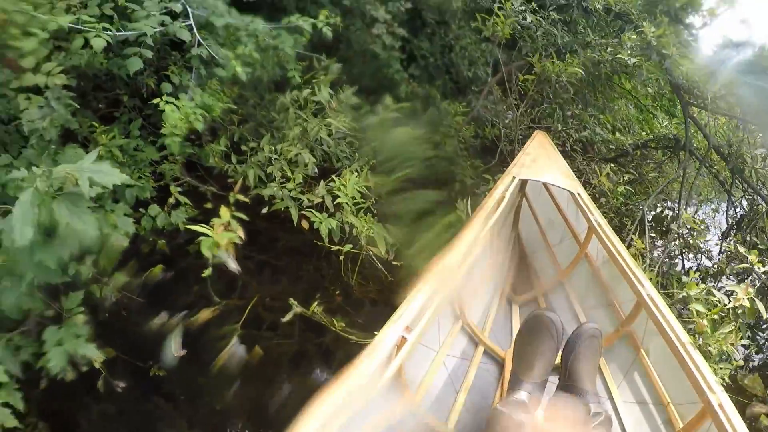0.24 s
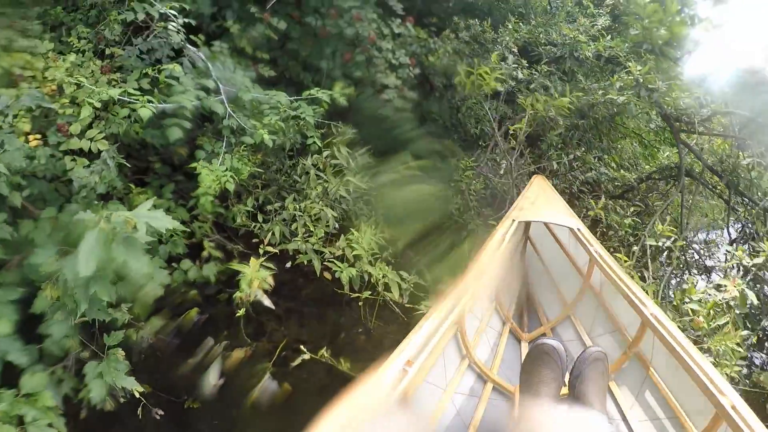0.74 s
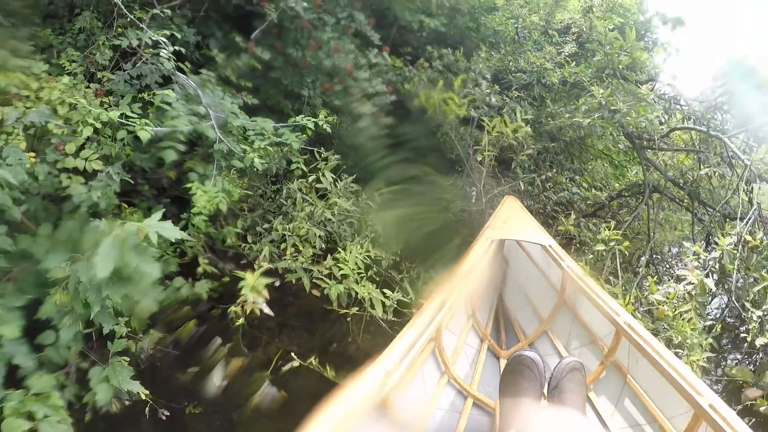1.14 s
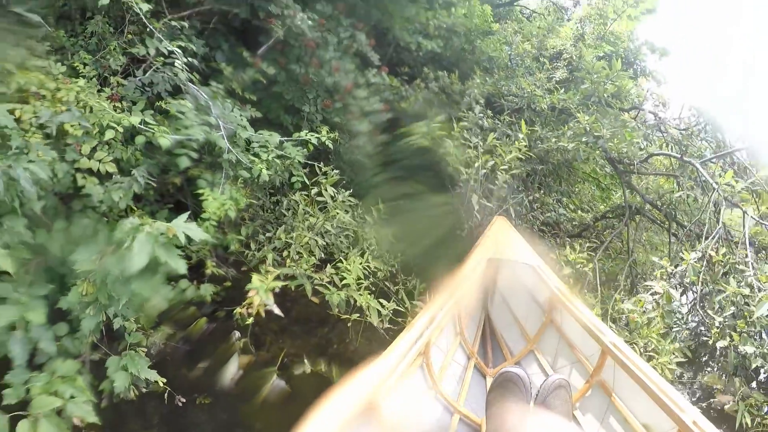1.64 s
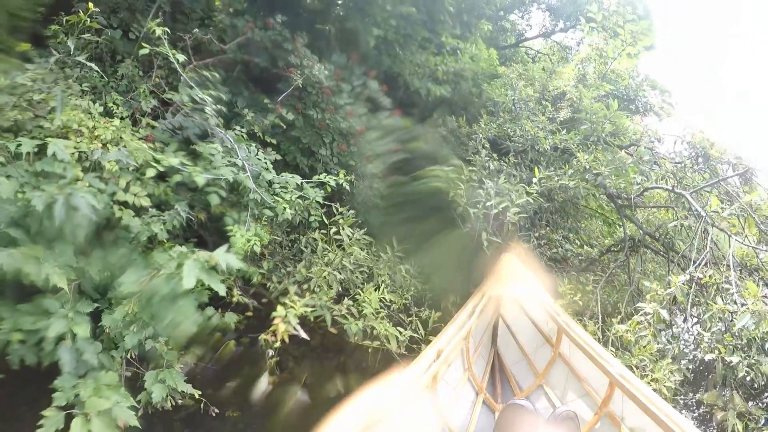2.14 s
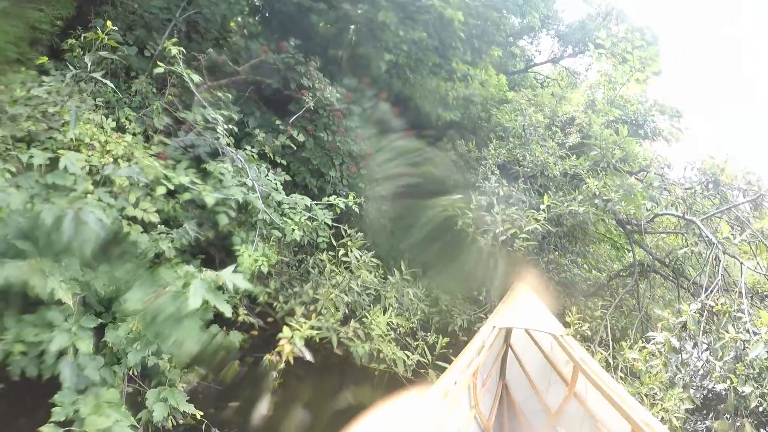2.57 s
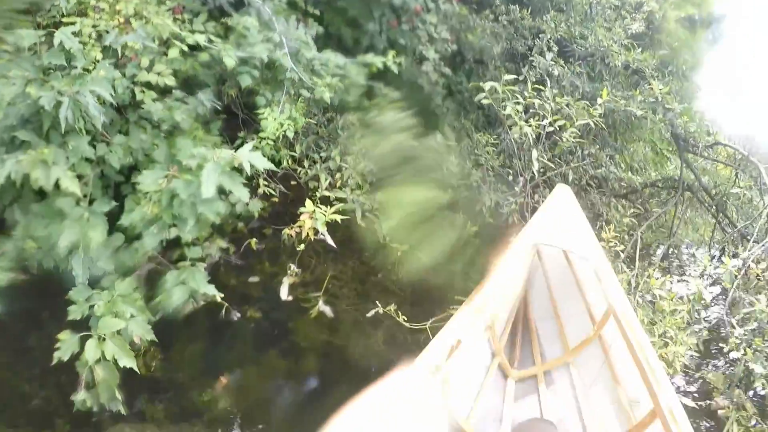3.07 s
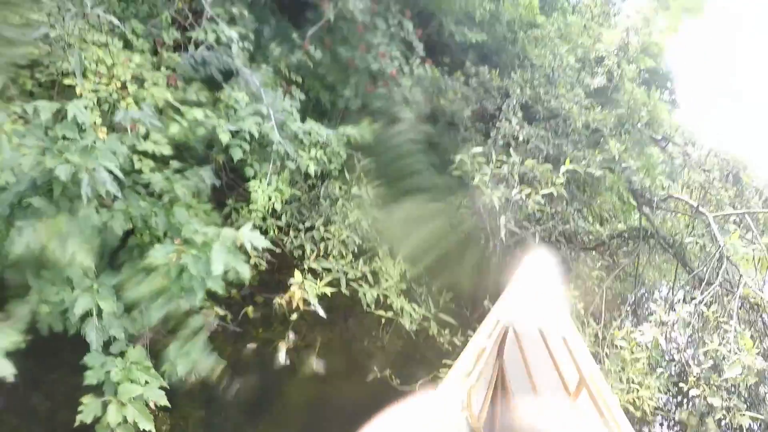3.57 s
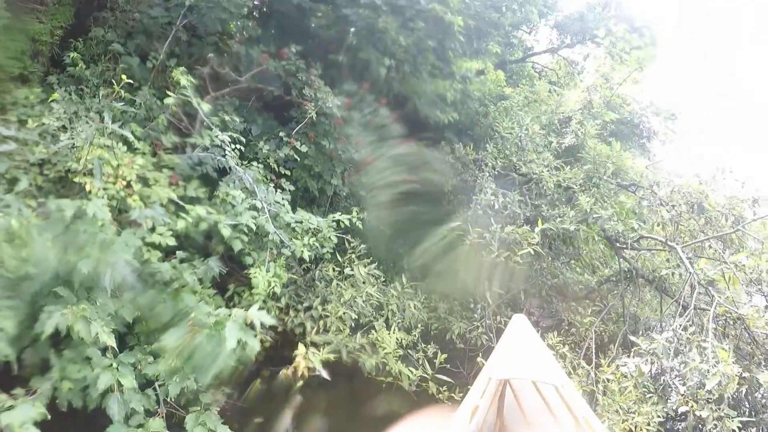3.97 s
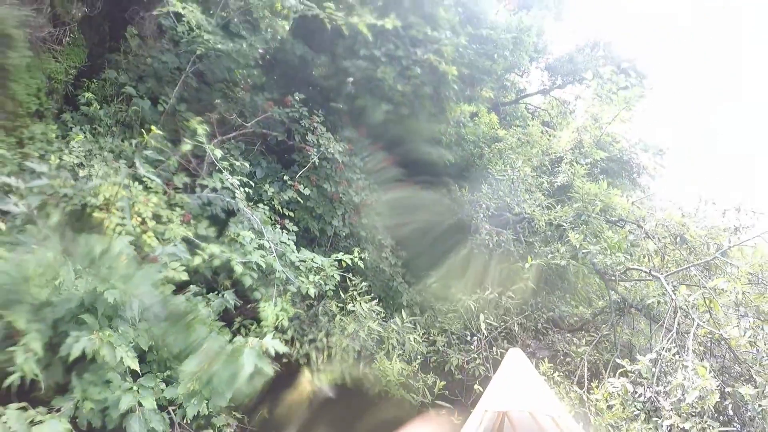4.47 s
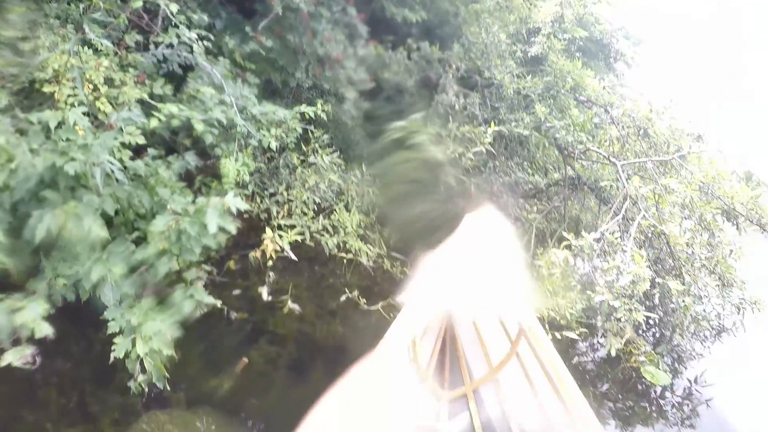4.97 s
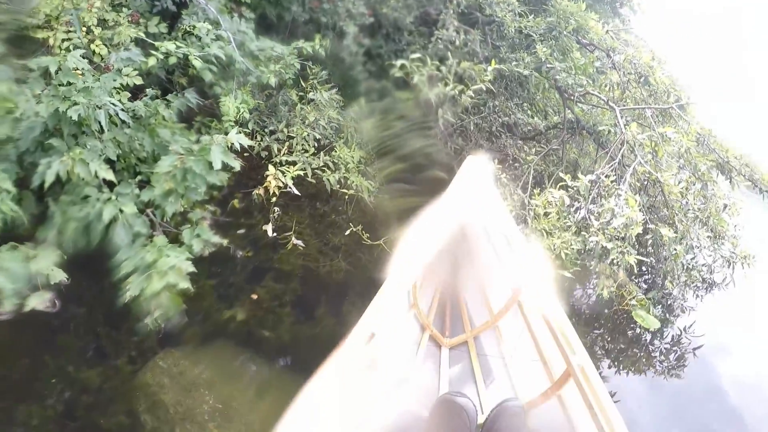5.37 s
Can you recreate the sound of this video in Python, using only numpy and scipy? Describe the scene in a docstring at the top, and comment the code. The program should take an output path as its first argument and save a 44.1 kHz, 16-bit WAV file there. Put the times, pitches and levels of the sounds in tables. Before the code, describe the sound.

Throughout, a quiet but constant insect chorus fills the treble, a rapid fluttering buzz with finer high ticks, over a wavering, very deep hull rumble and faint hiss. At 0.3 s a strong dull boom thuds through the canoe with a soft skin-like tap. Calm follows; a small twig tick at 1.7 s and faint bubbles gurgling upward between 1.75 and 2.15 s. At 2.4 s a medium wooden knock lands with a low thump. Around 2.95-3.0 s comes the loudest event: a hard, dry clack on the frame with overlapping heavy booms, dying quickly. Tiny rattles trail to 3.2 s. From 3.43 to 3.6 s a cluster of twig taps and dull bumps. Mostly insects and rumble until a moderate woody knock and boom at 4.97 s, then light ticks at 5.1-5.5 s with soft thuds. Close, muffled, dry mono microphone in a closed housing.

```python
"""Canoe under riverside bushes

A skin-on-frame canoe drifts along; the microphone sits in a closed housing on the paddler.
Filtered noise makes the hull's rumble and a throbbing chorus of insects that fills the treble.
A few bubbles gurgle as short rising sines. Paddle and twigs knock on the wooden frame and the hull booms:
both are sets of dying sines, set off by a blow or a push.
"""
import sys
import numpy as np
from scipy import signal
from scipy.fft import rfft, irfft
from scipy.io import wavfile
from scipy.ndimage import uniform_filter1d

SR = 44100
rng = np.random.default_rng(int(sys.argv[2]) if len(sys.argv) > 2 else 0)


def wav_record(signal):
    """Record a signal, one row per channel, as 16-bit PCM in the file named by sys.argv[1]."""
    frames = np.transpose(np.atleast_2d(signal))
    bounded = np.clip(frames, -1, 1)
    # unit amplitude maps onto the largest positive 16-bit level
    quanta = np.round(bounded * 32767).astype(np.int16)
    wavfile.write(sys.argv[1], SR, quanta)


N = 247401
T = np.arange(N) / SR  # time of each sample, in seconds


def undb(db):
    """Turn decibels into a plain factor."""
    return 10 ** (np.asarray(db) / 20)


def level(sound, db):
    """Scale a sound so that its average (rms) level is db."""
    return sound * undb(db) / np.sqrt(np.mean(sound ** 2))


def level_curve(table):
    """Loudness factor over time: straight lines in dB between the rows of a table."""
    seconds, db = np.transpose(table)
    return undb(np.interp(T, seconds, db))


def noise():
    """White noise as long as the scene."""
    return rng.standard_normal(N)


def colour(sound, spectrum, peaks=()):
    """Filter to a (Hz, dB) spectrum with resonances on top; the result has an rms of 1."""
    hz = np.fft.rfftfreq(N, 1 / SR) + 1  # the 1 keeps the logarithm finite
    corner_hz, corner_db = np.transpose(spectrum)
    gain_db = np.interp(np.log(hz), np.log(corner_hz), corner_db, left=-200, right=-200)
    for centre, width, top_db in peaks:
        gain_db = gain_db + top_db / (1 + (2 * (hz - centre) / width) ** 2)
    return level(irfft(rfft(sound) * undb(gain_db), N), 0)


def walk(rate):
    """Smooth random wander: levels held for 1 / rate seconds, then smoothed twice; its spread is 1."""
    hold = int(SR / rate)
    steps = np.repeat(rng.standard_normal(N // hold + 1), hold)
    wander = uniform_filter1d(uniform_filter1d(steps, hold), hold)[:N]
    return wander / np.std(wander)


def ring(modes, t, gain_db, fading):
    """Sum of sines, one for each mode (Hz, dB, t60), that die away along the clock `fading`."""
    total = 0
    for (hz, db, t60), extra_db in zip(modes, gain_db):
        decay = 10 ** (-3 * fading / t60)  # 60 dB down after t60 seconds
        total = total + undb(db + extra_db) * np.sin(2 * np.pi * hz * t) * decay
    return total


def add(out, start, sound, db):
    """Mix a sound in at `start` seconds with its peak at db."""
    i = int(start * SR)
    scaled = sound * undb(db) / np.max(np.abs(sound))
    out[i:i + len(sound)] += scaled[:N - i]


# How loud the low rumble is over time. Each row: time in seconds, level in dB.
LOW_RUMBLE_LEVEL = [(0.0, -40.5), (0.41, -35.5), (0.66, -39.5), (2.16, -42), (2.41, -34), (2.86, -33.5),
                    (2.98, -23), (3.17, -40), (3.58, -35), (4.34, -40), (4.6, -36.5), (5.39, -34.5),
                    (5.61, -42.5)]
# Tone colour of the low rumble, the upper rumble and the hiss.
# Each row: frequency in Hz, relative strength in dB per Hz.
LOW_RUMBLE_SPECTRUM = [(8.8, -35), (15, -6.5), (38, -0.5), (54, -3.5), (88, -12), (96, -18), (103, -29.5),
                       (130, -36.5), (170, -57), (290, -120)]
UPPER_RUMBLE_SPECTRUM = [(65, -29), (110, 2), (163, -2), (210, -4), (237, -6.5), (600, -19.5), (780, -22.5),
                         (1320, -120)]
HISS_SPECTRUM = [(240, -27.5), (400, -4.5), (635, -4.5), (848, -3.5), (1790, -5.5), (2220, -7),
                 (2600, -9.5), (3380, -30), (5720, -120)]
# Swells of the upper rumble. Each row: time of the top in seconds, level added at the top in dB.
JOLTS = [(2.41, -67), (2.98, -40), (3.58, -54), (5.39, -61.5)]
UPPER_DB, HISS_DB = -63, -69  # steady levels
JOLT_RISE_DB_S, JOLT_FALL_DB_S = 250, 200  # dB per second


def rumble():
    """Water and body movement shake the hull; the upper part comes in small bumps, under a faint hiss."""
    low = colour(noise(), LOW_RUMBLE_SPECTRUM) * undb(1.6 * walk(4))
    upper = colour(noise() * undb(2.5 * walk(50)), UPPER_RUMBLE_SPECTRUM)
    hiss = colour(noise() * undb(0.8 * walk(30)), HISS_SPECTRUM)
    upper_level = undb(UPPER_DB)
    for top, db in JOLTS:
        drop_db = np.maximum(JOLT_RISE_DB_S * (top - T), JOLT_FALL_DB_S * (T - top))
        upper_level = upper_level + undb(db - drop_db)
    return level_curve(LOW_RUMBLE_LEVEL) * low + upper_level * upper + undb(HISS_DB) * hiss


def throb(rate, drift):
    """A cosine whose rate (per second) wanders by the share `drift`; used for throbs, clicks and ticks."""
    wandering_rate = rate * (1 + drift * walk(5.6))
    return np.cos(2 * np.pi * np.cumsum(wandering_rate) / SR)


# How loud the chorus is over time. Each row: time in seconds, level in dB.
CHORUS_LEVEL = [(0.0, -53), (0.26, -53), (0.75, -52.5), (1.78, -52.5), (3.19, -53), (3.45, -52), (4.5, -54),
                (4.89, -52), (5.61, -53.5)]
# Tone colour of the chorus. Each row: frequency in Hz, relative strength in dB per Hz.
CHORUS_SPECTRUM = [(1290, -59.5), (2200, -23.5), (2350, -13), (2590, -11), (3200, -7), (3980, -5),
                   (4350, -2), (5280, 1), (5730, -3), (6320, -3), (6910, -9), (7610, -13.5), (8060, -16.5),
                   (13200, -24.5), (15300, -31)]
# Narrow peaks on that colour. Each row: centre in Hz, width in Hz, height in dB.
CHORUS_PEAKS = [(3070, 100, 1.5), (3666, 200, 3), (4475, 63, 8), (5070, 62, 4.5), (5370, 150, 4.5),
                (5840, 80, 4.5), (6173, 150, 6.5), (7424, 300, 4), (8620, 170, 1.5), (9400, 200, 4.5),
                (10870, 400, 5), (13600, 300, 3.5)]
# The near singers. Each row: throbs a second, throb depth from 0 to 1, wing clicks a second,
# click depth from 0 to 1, relative level in dB before the throbs and clicks.
SINGERS = [(46.5, 0.6, 286, 0, -1), (51.4, 1, 240, .3, -6.5), (97, 0.3, 270, 0.04, -5)]
SINGING_LOW_HZ, SINGING_HIGH_HZ = 4060, 6700  # the throbbing is strongest between these
HIGH_TICKS_DB = -80


def insects():
    """Throbbing, buzzing noise from near singers, smooth noise from far ones, and higher, rapid ticks."""
    buzz = 0
    for rate, depth, clicks, click_depth, db in SINGERS:
        singer = undb(db + 0.43 * walk(8.9)) * noise()
        singer = singer * (1 + depth * throb(rate, 0.07))
        buzz = buzz + singer * (1 + click_depth * throb(clicks, 0.018))
    far = noise() * undb(0.62 * walk(11))

    # at each frequency, the near share and the far share add up to the same power
    hz = np.fft.rfftfreq(N, 1 / SR)
    low_edge = 1 + (SINGING_LOW_HZ / (hz + 1)) ** 12
    high_edge = 1 + (hz / SINGING_HIGH_HZ) ** 3
    near_share = 0.95 / np.sqrt(low_edge * high_edge)
    far_share = np.sqrt(1 - near_share ** 2)
    mixed = irfft(near_share * rfft(level(buzz, 0)) + far_share * rfft(far), N)
    chorus = colour(mixed, CHORUS_SPECTRUM, CHORUS_PEAKS)

    pulses = np.exp(2.2 * (throb(53, 0.3) - 1))
    ticks = noise() * pulses * undb(3.6 * walk(22) + 2.2 * walk(45))  # the levels come and go at random
    high = colour(ticks, [(10500, -23), (11800, -5), (13000, -2), (14200, -5), (15000, -14.5)])
    return level_curve(CHORUS_LEVEL) * chorus + level(high, HIGH_TICKS_DB)


# Bubbles by the hull. Each row: start in seconds, starting pitch in Hz, peak level in dB, length in seconds.
BUBBLES = [(1.745, 458, -65, 0.15), (1.757, 352, -66, 0.083), (1.828, 360, -63, 0.095),
           (1.837, 482, -69, .05), (2.026, 478, -57, 0.075), (2.031, 1400, -66, 0.032),
           (2.052, 640, -62, 0.049), (2.078, 817, -65, 0.045), (2.129, 1200, -67, 0.027)]


def bubbles():
    """Short sines that start fast, fade, and glide up as the bubble nears the surface."""
    out = np.zeros(N)
    for start, hz, db, length in BUBBLES:
        t = T[:int(length * SR)]
        tone = np.sin(2 * np.pi * hz * t * (1 + 0.045 * t / length))  # ends 9 % higher
        swell = np.sin(np.pi * (t / length) ** 0.2)
        add(out, start, tone * swell, db)
    return out


# Booms of the hull. Each row: start in seconds, peak level in dB, extra level of the second mode in dB,
# length of the push in ms.
BOOMS = [(0.308, -6.5, 7.5, 13.7), (2.378, -15.5, -9, 4.2), (2.91, -17.5, 8, 23.6), (2.963, -13.5, -4, 2.7),
         (2.982, -11, -2, 10.6), (3.006, -3.5, 5, 8.9), (3.184, -26.5, -4, 15.4), (3.454, -18, 5.5, 13),
         (3.493, -19, 4, 8), (3.562, -12.5, -0.5, 16.2), (3.585, -14, -1.5, 14.4), (3.931, -28, 10, 13.8),
         (4.666, -28.5, 0.5, 11), (4.975, -11.5, -4.5, 12.4), (5.336, -24.5, 2.5, 4.5),
         (5.406, -22.5, -6, 9.6), (5.458, -22, -1, 7.5)]
# The hull's three modes. Each row: frequency in Hz, relative level in dB, time to fade by 60 dB in seconds.
HULL = [(46, 8.5, 0.12), (74.2, 5, 0.24), (109, 0, 0.21)]
THIRD_DB = -8  # extra level of the third mode when the second has none


def booms():
    """A soft push on the hull: the longer the push, the less of its upper modes."""
    out, t = np.zeros(N), T[:SR // 2]
    for start, db, second_db, push_ms in BOOMS:
        push = np.hanning(int(max(push_ms, 1) * SR / 1000))
        # a push that favours the second mode drives the third less, dB for dB
        gain_db = [0, second_db, THIRD_DB - second_db]
        add(out, start, signal.fftconvolve(ring(HULL, t, gain_db, t), push), db)
    return out


# Knocks on the frame. Each row: start in seconds, spot struck, peak level of the strongest wood group in dB,
# hardness as a tilt in dB per octave, peak level of the skin group in dB, contact time in ms.
KNOCKS = [(0.3013, "rib", -37.5, -1, -23, 5.9), (1.6987, "twig tick", -37, 11, -58, 6.3),
          (2.3683, "gunwale", -19, 0, -23.5, 6.3), (2.9538, "thwart", -2.5, 0.6, -13, 3.06),
          (2.979, "twig ring", -36, 2, -27, 8), (2.9979, "rib", -26, 1, -14, 5.8),
          (3.067, "rib", -51, 7, -46, 5.1), (3.087, "twig ring", -58.5, 3, -45.5, 16),
          (3.159, "twig ring", -57, 6.5, -54, 4), (3.431, "twig tick", -45.5, -3, -45, 4.2),
          (3.451, "gunwale", -53, 6, -32.5, 4.6), (3.4738, "twig ring", -48, 2, -38.5, 1.4),
          (3.48, "rib", -43.5, 4.5, -39, 4.6), (3.496, "twig ring", -55, -9, -42, 4.4),
          (3.522, "twig tick", -43.5, -4, -56, 4.1), (3.535, "gunwale", -50, -9, -44, 19),
          (3.5605, "twig tick", -30.5, -1.2, -25.5, 5), (3.5756, "rib", -37, -0.7, -22, 8.4),
          (4.385, "twig ring", -57, -1.5, -65.5, 5.2), (4.91, "twig tick", -52.5, -7, -52, 12),
          (4.9686, "thwart", -24.5, -5, -29, 5.1), (5.107, "stringer", -38, 2.7, -62, 6.8),
          (5.124, "twig ring", -53, -1, -65.5, 5), (5.155, "stringer", -46, 4.7, -54, 9.7),
          (5.265, "twig tick", -52.5, -0.5, -57.5, 15), (5.283, "twig tick", -46.5, -6, -47.5, 4.3),
          (5.398, "twig tick", -48.5, -1, -54, 5.8), (5.405, "twig ring", -58, 1.5, -53, 4.4),
          (5.448, "twig tick", -45, -3.5, -60, 2.8), (5.467, "twig ring", -57.5, 7, -72, 6.5)]
# What the frame rings with. Each row: frequency in Hz, relative level in dB within its group,
# time to fade by 60 dB in seconds once contact has ended.
FRAME = np.array([(179.6, 0.5, 0.075), (210, 5, 0.039), (248, 0, 0.054), (286, -9.5, 0.013), (540, 0, .02),
                  (572, -5, .11), (685, 0, .024), (755, -11, .055), (872, -13, .04), (1105, 0, .014),
                  (1300, -8, .011), (1648, -18, .04), (1825, 0, .017), (2070, -10, .009),
                  (2300, -4, 0.0043), (2560, 0.5, 0.013), (2680, 1.5, 0.0063), (3330, 8.5, 0.016),
                  (3730, -10, 0.0088)])
# Where one group of modes ends and the next begins, in Hz; the skin is the lowest group.
GROUP_EDGES_HZ = [450, 625, 950, 1500, 2200, 3100]
# Share of each wood group by the spot struck. Each entry, in relative dB: gunwale, low ribs, high ribs,
# ring near 1.8 kHz, tick near 2.6 kHz, top.
SPOTS = {"gunwale": (-4.5, 3, -7, -15.5, -22, -26), "thwart": (-6.5, 0.5, 1.5, -5, -17, -39),
         "stringer": (-14, 1.5, -14, -7.5, 0.5, -18), "rib": (-17.5, 1, -7, 2.5, -1, -28.5),
         "twig tick": (-16.5, -24, -7, -3.5, 5.5, -27), "twig ring": (-15, -21.5, -5.5, -2, -18.5, -18.5)}
SNAP_DB, SNAP_HZ, SNAP_S = -34.5, (2985, 6972), 0.002  # dB relative to the wood, band, fading time


def knocks():
    """Each contact is a blow, a snap and a short rattle; spot and hardness share it among the modes."""
    out, t = np.zeros(N), T[:SR // 5]
    contact_t = T[:SR // 40]
    group = np.searchsorted(GROUP_EDGES_HZ, FRAME[:, 0])
    octave = np.log2([np.mean(FRAME[group == g, 0]) for g in range(1, 7)])
    snap_band = signal.butter(1, SNAP_HZ, "band", fs=SR, output="sos")
    for start, spot, wood_db, tilt_db, skin_db, contact_ms in KNOCKS:
        rattle_noise, scatter, snap_noise = rng.standard_normal((3, len(contact_t)))
        contact = max(contact_ms, 0.5) / 1000
        progress = contact_t / contact  # 0 to 1 while the contact lasts
        fade_in, fade_out = np.clip(progress / 0.15, 0, 1), np.clip((1 - progress) / 0.3, 0, 1)
        force = 0.025 * rattle_noise * fade_in * fade_out
        force[SR // 1500] += 1  # the blow itself
        fading = t - 0.87 * np.minimum(t, contact)  # while the contact lasts it keeps feeding the ring

        share_db = np.array(SPOTS[spot]) + tilt_db * octave
        group_db = [skin_db, *(wood_db + share_db - share_db.max())]
        spread_db = 4 if "twig" in spot else 1.5  # twigs land anywhere
        for g, db in enumerate(group_db):
            modes = FRAME[group == g]
            rise_s = 0.00044 + 0.49 / modes[0, 0]  # lower modes take longer to swing up
            swing = 1 - np.exp(-(t / rise_s) ** 2)
            scatter_db = spread_db * scatter[8 * g:8 * g + len(modes)]
            response = swing * ring(modes, t, scatter_db, fading)
            add(out, start, signal.fftconvolve(response, force), db)

        snap = snap_noise * contact_t * np.exp(-contact_t / SNAP_S)
        add(out, start, signal.sosfilt(snap_band, snap), wood_db + SNAP_DB)
    return out


def scene():
    """All the layers together, as one channel."""
    return (rumble() + insects() + bubbles() + booms() + knocks())[None]


def record(dry):
    """The microphone drops the deepest bass, rounds the loudest peaks and cuts the top."""
    bass_cut = signal.butter(2, 24, "high", fs=SR, output="sos")
    top_cut = signal.ellip(10, 0.2, 60, 15250, fs=SR, output="sos")  # cuts above 15250 Hz
    mic = signal.sosfilt(bass_cut, dry)
    rounded = mic / (1 + (mic / 0.95) ** 12) ** (1 / 12)  # bends over near 0.95
    return signal.sosfilt(top_cut, rounded)


dry = scene()
out = record(dry)
wav_record(out)
```